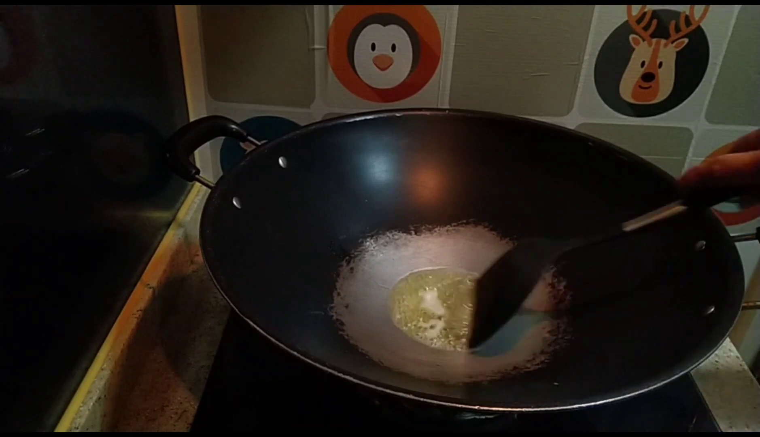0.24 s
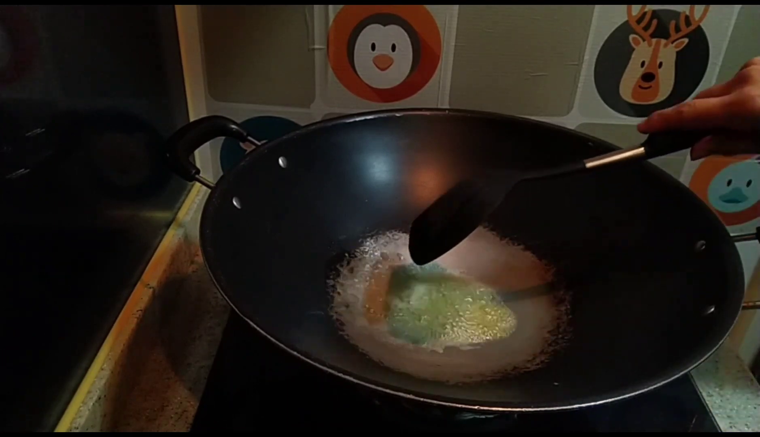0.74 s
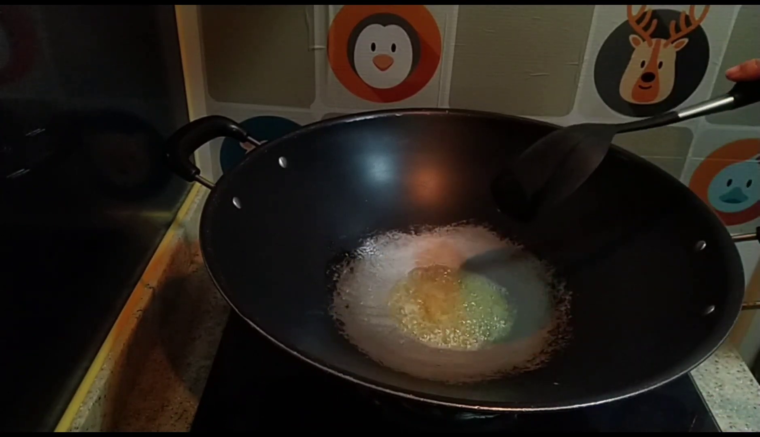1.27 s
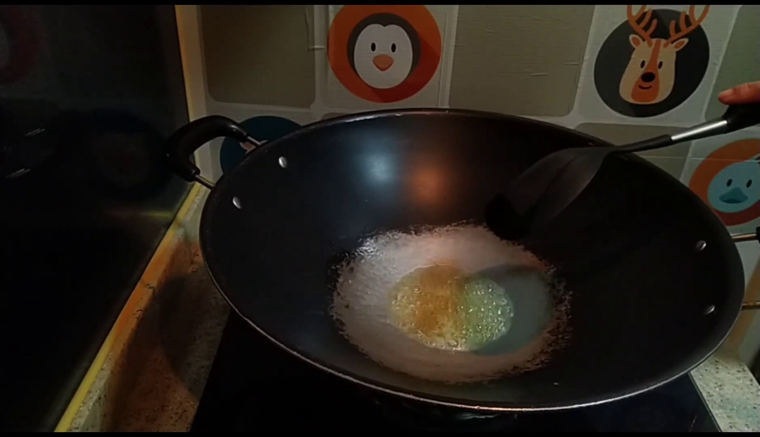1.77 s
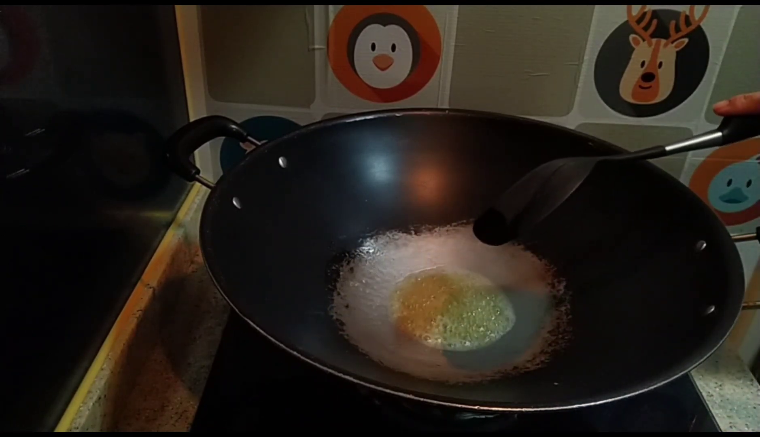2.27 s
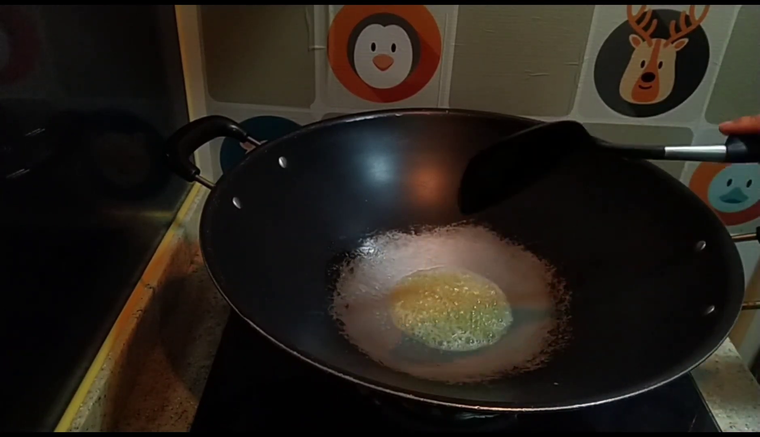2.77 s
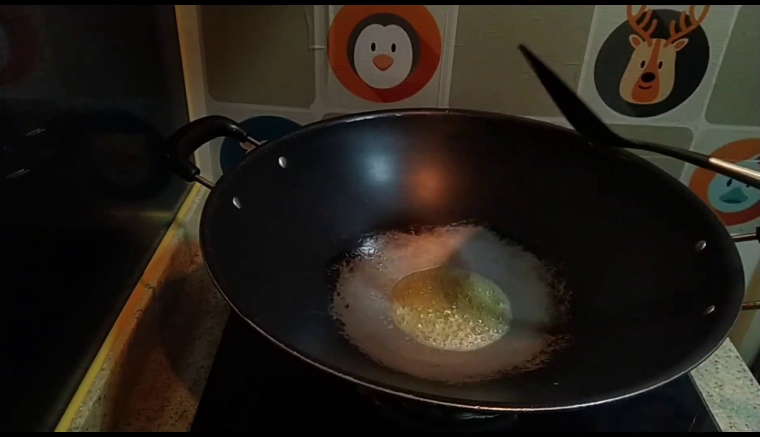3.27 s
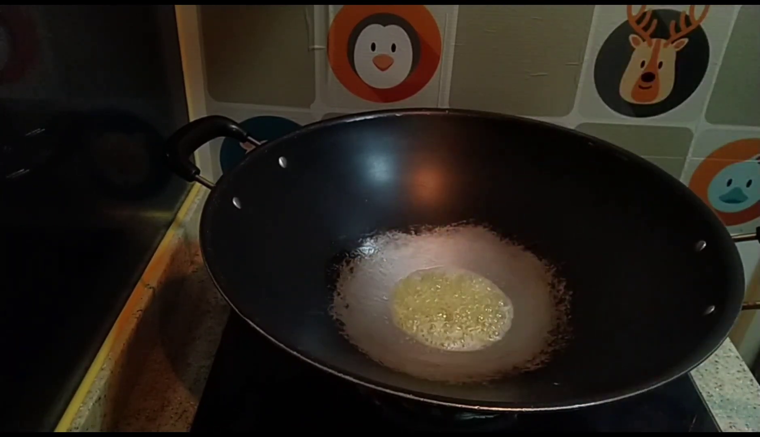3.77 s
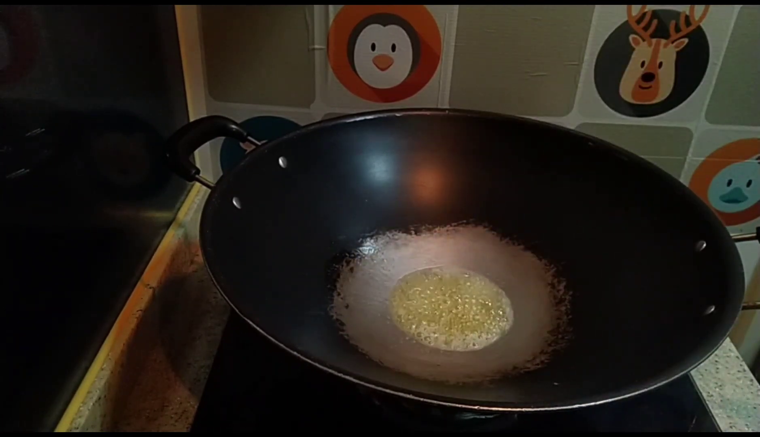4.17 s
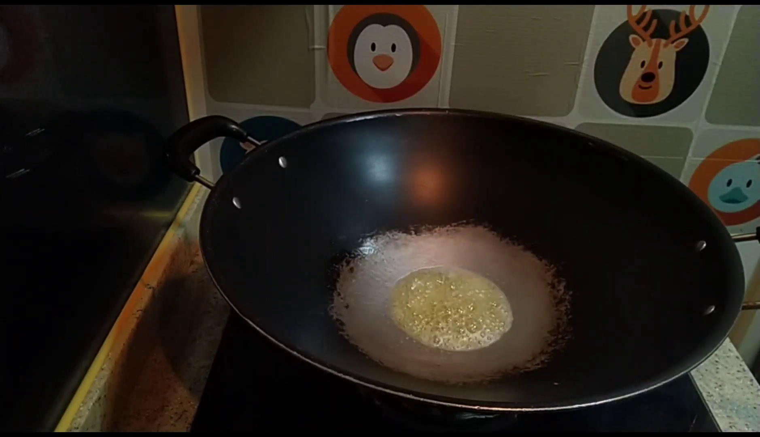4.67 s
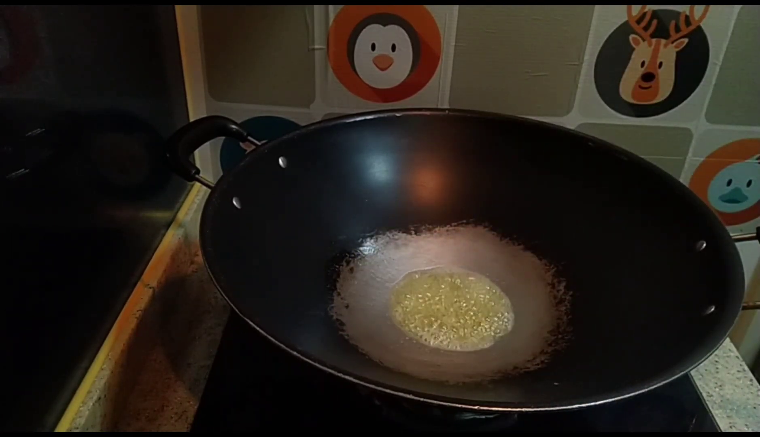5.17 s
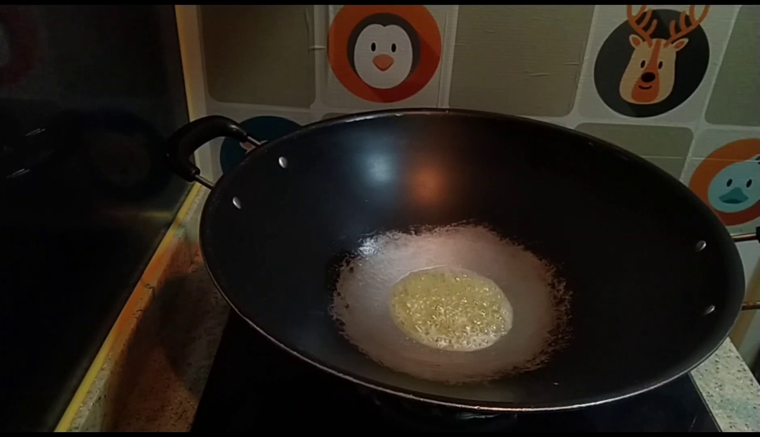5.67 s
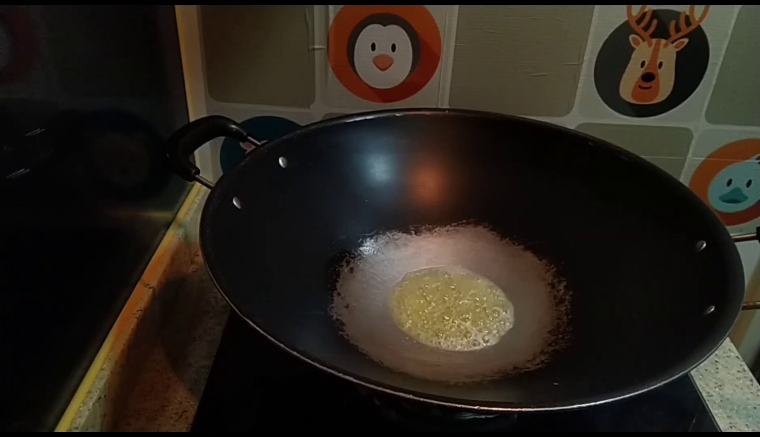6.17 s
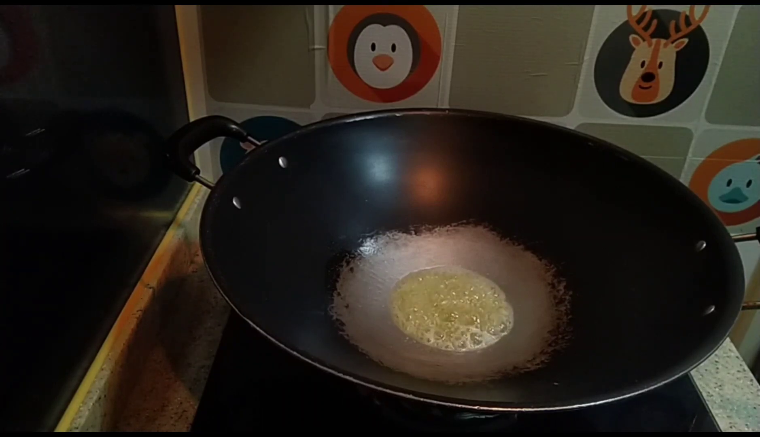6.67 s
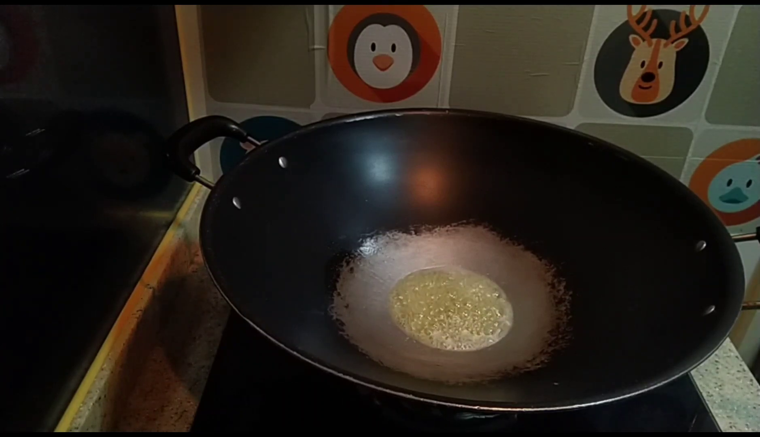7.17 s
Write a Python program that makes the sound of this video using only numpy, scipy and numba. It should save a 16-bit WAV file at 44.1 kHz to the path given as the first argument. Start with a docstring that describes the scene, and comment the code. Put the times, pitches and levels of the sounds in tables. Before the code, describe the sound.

Close, crackling sizzle of butter bubbling in a steel wok, with one soft spatula push early and a quick double knock.

```python
"""In a small kitchen, butter sizzles in a hot steel wok, heard in mono from about an arm's length.
Each bursting steam bubble is a damped oscillator, smeared by reflections in the bowl and the room:
the pool boils, its thin film fizzes, blisters plop and sputter, and droplets of fat spit.
A plastic spatula pushes the butter once: the pool quiets and refills while the smear hisses and cooks
off. Later something knocks twice nearby. A low stove hum lies under it all."""
import sys
import numpy as np
from scipy import signal
from scipy.fft import rfft, irfft, next_fast_len
from scipy.io import wavfile
from numba import njit

SR = 44100
rng = np.random.default_rng(int(sys.argv[2]) if len(sys.argv) > 2 else 0)


def int16_out(signal):
    """Quantize to a 16-bit WAV file."""
    q = np.round(np.clip(np.atleast_2d(signal).T, -1, 1) * 32767)
    wavfile.write(sys.argv[1], SR, q.astype(np.int16))


N = 327663
T = np.arange(N) / SR

# spectral envelope of the sizzle: (frequency [Hz], gain [dB])
SIZZLE_SPECTRUM = [(1500, -44), (1800, -34), (2100, -11), (2300, -5.5), (2750, -5), (3300, 0), (4200, -1.5),
                   (5200, -3.5), (6400, -5.5), (7650, -6), (8300, -15.5), (9200, -22.5), (11000, -27),
                   (15500, -56)]
# spectral envelope of the finest spray: (frequency [Hz], gain [dB])
SPRAY_SPECTRUM = [(7000, 13.5), (8200, 12), (9600, -4), (11000, -5.5), (13000, -2), (15500, 2)]
# resonances of the steel bowl: (frequency [Hz], bandwidth [Hz], relative gain [dB])
WOK_MODES = [(1230, 39, 1), (1710, 7.5, -9), (1860, 16, 4), (2000, 11, 3), (2269, 62, 0), (2586, 24, 9),
             (2830, 16, 9.5), (3168, 40, 6.5), (3287, 8, 0), (3523, 120, -4.5), (4120, 64, 2)]
# spectral envelope of stove and kitchen noise: (frequency [Hz], gain [dB])
WHIR_SPECTRUM = [(25, -15), (50, -19), (85, -5), (140, -1.5), (200, -12), (270, 2), (330, -1.5), (390, -1),
                 (500, -1), (650, -2), (1200, -4.5), (1600, -4), (4000, -43.5), (15000, -27)]
# tones of the stove: (frequency [Hz], median rms level [dB])
HUM_TONES = [(101, -80.5), (141, -86.5), (325, -77), (528, -78), (791, -80.5)]
# blisters that open with a plop: (time [s], relative level [dB], frequency [Hz])
BLISTER_PLOPS = [(.035, -32.5, 1945), (1.257, -34, 2280), (1.53, -47.5, 1760), (1.731, -42, 2130),
                 (1.863, -44, 2250), (2.146, -35, 2090), (2.33, -42, 1870), (2.383, -31.5, 2150),
                 (2.717, -31, 1930), (2.73, -35.5, 1720), (3.17, -41, 2270), (3.202, -41, 2100),
                 (3.367, -32, 1940), (3.385, -39.5, 1900), (3.991, -38.5, 1905), (4.051, -37.5, 2050),
                 (4.36, -37.5, 1880), (4.535, -40.5, 1980), (4.927, -38.5, 1880), (5.037, -41, 1900),
                 (5.314, -39, 2040), (5.46, -35, 2010), (5.515, -32, 2004), (5.73, -33.5, 2070),
                 (5.792, -34.5, 2050), (6.199, -45, 2020), (6.293, -38, 2030), (6.525, -34, 1950),
                 (6.572, -37.5, 1840), (6.831, -42, 1910), (6.905, -38, 2035), (6.963, -35, 2030),
                 (7.178, -37, 2250), (7.276, -29.5, 2040)]
# the loudest sharp bursts: (time [s], relative level [dB], frequency [Hz])
BUBBLE_POPS = [(0.1498, -23.5, 2750), (0.217, -22.5, 3230), (0.4469, -28, 3680), (0.5484, -31, 4500),
               (0.8774, -25, 4300), (1.0014, -26.5, 3550), (1.2047, -24, 3100), (1.2413, -19.5, 4180),
               (2.0228, -30, 4180), (2.4099, -24, 3180), (2.5177, -24, 3700), (2.846, -27, 3270),
               (2.9597, -25, 3230), (3.2334, -23.5, 3520), (3.4644, -23, 3990), (3.8661, -24, 3840),
               (3.927, -22, 3450), (3.9599, -23.5, 2830), (4.1203, -24, 4540), (4.16, -22.5, 2580),
               (4.1939, -19.5, 4130), (4.4525, -24, 3260), (4.5504, -22.5, 3530), (4.628, -22, 3340),
               (4.7277, -22.5, 3380), (4.9044, -20, 3100), (5.8173, -26, 3130), (5.8591, -23.5, 3650),
               (5.98, -27, 3130), (6.0755, -22, 3380), (6.0995, -22.5, 4080), (6.1333, -25, 4130),
               (6.1454, -27, 3380), (6.2896, -30, 4170), (6.7531, -25, 2950), (7.0788, -21.5, 3770),
               (7.1644, -22, 4160)]
# spitting droplets: (time [s], peak level [dB], lower band edge [Hz], upper band edge [Hz])
FAT_SPITS = [(.2144, -40, 7000, 15800), (0.594, -20, 3770, 6300), (1.888, -46, 7000, 16000),
             (3.186, -38, 6500, 16000), (3.96, -50, 7000, 16000), (6.018, -46, 7000, 16000)]
# spatula strokes: (time [s], duration [s], relative level [dB])
SPATULA_STROKES = [(0.313, 0.28, -50.5), (0.622, 0.17, -55.5)]
# soft contacts of spatula and wok: (time [s], relative level [dB], frequency [Hz])
SPATULA_BUMPS = [(.345, -55, 660), (0.375, -39, 539), (0.415, -41, 315), (.64, -53, 528), (.745, -55, 947),
                 (0.794, -47, 315), (.955, -61, 248), (1.40, -50.5, 542), (1.439, -44, 320),
                 (1.505, -56, 423), (2.759, -52.5, 527), (3.419, -56, 474), (3.549, -61, 100.5),
                 (3.669, -45, 536), (4.025, -47, 517), (6.012, -48.5, 533), (6.535, -53, 317),
                 (6.661, -57, 318)]
# faint rings of the bowl's lowest mode: (time [s], relative level [dB])
BOWL_RINGS = [(1.8502, -60), (2.8399, -65), (3.2924, -57), (3.603, -56), (4.3271, -55), (4.9496, -53),
              (4.977, -50), (5.2904, -56), (5.5603, -57), (6.6066, -53)]
# two dull knocks, the second a double contact: (time [s], contact peak [dB], hollow body peak [dB])
KNOCK_CONTACTS = [(5.629, -39.5, -49.5), (5.722, -33, -46), (5.735, -28, -36)]
# modes of the knocked object: (frequency [Hz], relative level [dB], 60 dB decay time [s])
OBJECT_MODES = [(458, -8, 0.12), (525, -4, 0.07), (960, -5, 0.15), (1105, 0.5, 0.098), (1198, 9, 0.058),
                (1270, -22, .15)]

LARGE_DB, SMALL_DB, FIZZ_DB, SPRAY_DB = -47.5, -38, -41.5, -66  # undisturbed boil, rms before surges
EMPTY_LARGE_DB, EMPTY_SMALL_DB = -13.5, -7.5  # gains when the pool is emptied
SMEAR_HISS_DB, SMEAR_SPRAY_DB = -44.5, 9.5  # fresh smear: hiss rms before surges, gain of the spray
CUTOFF_HZ = 15550


def undb(db):
    """Amplitude ratio of a level in decibels."""
    return 10 ** (np.asarray(db) / 20)


def level(x, db):
    """Scale a signal to an rms level."""
    return x * undb(db) / np.sqrt(np.mean(x ** 2))


def add(out, s, x, db):
    """Superpose a sound at time s with a given peak level."""
    i = max(int(s * SR), 0)
    out[i:i + len(x)] += (x * undb(db) / np.abs(x).max())[:N - i]


def fade(t60):
    """Half a second of exponential decay, falling 60 dB in t60 seconds."""
    return np.exp(-np.log(1000) * T[:SR // 2] / t60)


def swell(start_s, rise_s, hold_s, decay_s):
    """Envelope from 0 to 1: linear rise, hold, exponential relaxation."""
    rise = np.clip((T - start_s) / rise_s, 0, 1)
    return rise * np.exp(-np.maximum(T - start_s - rise_s - hold_s, 0) / decay_s)


def band(x, lo_hz, hi_hz, order=2):
    """Band-pass filter."""
    edges = [lo_hz, min(hi_hz, SR / 2 - 1)]
    return signal.sosfilt(signal.butter(order, edges, "band", fs=SR, output="sos"), x)


def colour(x, spectrum):
    """Weight a signal by a spectral envelope."""
    hz, db = np.transpose(spectrum)
    size = next_fast_len(N + SR)
    f = np.maximum(np.fft.rfftfreq(size, 1 / SR), 1)
    return irfft(rfft(x, size) * undb(np.interp(np.log(f), np.log(hz), db)), size)[:N]


def drift(rate):
    """Random modulation of unit rms, with rate new values a second."""
    knots = rng.standard_normal(int(N / SR * rate) + 2)
    return level(np.interp(T * rate, np.arange(len(knots)), knots), 0)


def echoes(bowl_db, bowl_t60, room_db, room_t60):
    """Impulse response from one spot: direct sound, early bowl reflections, tiled-room reverberation."""
    path = np.zeros(SR // 2)
    for db, t60 in ((bowl_db, bowl_t60), (room_db, room_t60)):
        tail = rng.standard_normal(SR // 2) * fade(t60)
        path += undb(db) * tail / np.linalg.norm(tail)
    path[0] += 1
    return path


def ping(hz, cycles):
    """A resonance builds up, then decays with a time constant given in cycles."""
    age = T[:SR // 8] * hz
    return (1 - np.exp(-age * 4 / cycles)) * np.exp(-age / cycles) * np.sin(2 * np.pi * age)


@njit
def damped_sines(start, hz, cycles, amplitude):
    """Superposition of damped oscillators, one for each bubble."""
    out = np.zeros(N)
    for k in range(len(start)):
        pole = np.exp((2j * np.pi - 1 / cycles[k]) * hz[k] / SR)
        z = amplitude[k] + 0j
        for i in range(int(start[k]), min(N, int(start[k] + 6 * cycles[k] * SR / hz[k]))):
            out[i] += z.imag
            z *= pole
    return out


def bubbles(rate, lo_hz, hi_hz, cycles, spread_db, spots=4):
    """Shot noise of random bursts, many weak and a few strong; each spot has its own echoes."""
    out = np.zeros(N)
    for _ in range(spots):
        when, pitch, ring, chance = rng.random((int(rate * N / SR / spots), 4)).T
        hz = lo_hz + (hi_hz - lo_hz) * pitch
        decay_cycles = cycles * (.5 + ring)
        size = np.minimum(-np.log(1 - chance), 4.8)  # capped exponential distribution
        amplitude = undb(spread_db * size) * np.sqrt(hz / decay_cycles)
        path = echoes(bowl_db=2, bowl_t60=0.064, room_db=-2.5, room_t60=0.39)
        out += signal.oaconvolve(damped_sines(when * N, hz, decay_cycles, amplitude), path)[:N]
    return out


def wok(x, ring_db):
    """Forced vibration: the steel bowl adds its narrow resonances."""
    ring = sum(undb(db) * signal.lfilter(*signal.iirpeak(hz, hz / width, fs=SR), x)
               for hz, width, db in WOK_MODES)
    return x + undb(ring_db) * ring


def emptiness():
    """Displacement and relaxation, 0 to 1: the spatula parts the pool and the butter runs back."""
    return swell(start_s=0.062, rise_s=0.22, hold_s=0.18, decay_s=0.74)


def pool():
    """Bubble resonance in quick surges: large bubbles ring lower, and quiet most as the pool parts."""
    large = bubbles(rate=520, lo_hz=2090, hi_hz=2690, cycles=3.2, spread_db=5, spots=8)
    small = bubbles(rate=1800, lo_hz=2640, hi_hz=5000, cycles=2.1, spread_db=3.3, spots=12)
    large = colour(wok(band(large, 2143, 2870, order=6), ring_db=-1.5), SIZZLE_SPECTRUM)
    small = colour(wok(band(small, 2520, 9000, order=6), ring_db=-6), SIZZLE_SPECTRUM)
    return (level(large, LARGE_DB) * undb(EMPTY_LARGE_DB * emptiness() + 2.06 * drift(14))
            + level(small, SMALL_DB) * undb(EMPTY_SMALL_DB * emptiness() + 0.97 * drift(42)))


def film():
    """Finer bubbles resonate higher: the film fizzes and sprays, and a fresh smear hisses until dry."""
    smear = swell(start_s=0.016, rise_s=0.66, hold_s=0.9, decay_s=1)
    fizz = bubbles(rate=5000, lo_hz=4550, hi_hz=8830, cycles=1.92, spread_db=4.5, spots=8)
    hiss = bubbles(rate=4000, lo_hz=6500, hi_hz=10060, cycles=3.2, spread_db=5)
    spray = bubbles(rate=3000, lo_hz=7270, hi_hz=15200, cycles=1.3, spread_db=2, spots=3)
    fizz = level(colour(band(fizz, 4850, 13000), SIZZLE_SPECTRUM), FIZZ_DB)
    hiss = level(colour(band(hiss, 5500, 16000), SIZZLE_SPECTRUM), SMEAR_HISS_DB)
    spray = level(colour(band(spray, 4600, 20000), SPRAY_SPECTRUM), SPRAY_DB)
    return undb(0.88 * drift(50)) * (fizz + hiss * smear + spray * undb(SMEAR_SPRAY_DB * smear))


def stove():
    """A broadband whir and a line spectrum of hum, both under slight random modulation."""
    whir = level(colour(rng.standard_normal(N), WHIR_SPECTRUM), -66.5)
    waver = undb(.6 * drift(6))
    hum = sum(undb(db + 2 * drift(7)) * np.sqrt(2) * np.sin(2 * np.pi * hz * T + 0.28 * drift(7.5))
              for hz, db in HUM_TONES)
    return whir * waver + hum


def simmer():
    """Stray blisters resonate faintly in a narrow band, more faintly while the pool is parted."""
    stray = bubbles(rate=41, lo_hz=1812, hi_hz=1980, cycles=7, spread_db=1)
    return level(band(stray, 1784, 2064, order=4), -65) * undb(-10 * emptiness())


def plops():
    """Low blister resonances excite wok and room, and each leaves a dying sputter of big bubbles."""
    out, sputter_power = np.zeros(N), np.zeros(N)
    for s, db, hz in BLISTER_PLOPS:
        path = echoes(bowl_db=-2, bowl_t60=0.076, room_db=4, room_t60=0.3)
        ring = wok(signal.fftconvolve(ping(hz, cycles=5.8), path), ring_db=3)
        add(out, s, band(ring, 0.805 * hz, 1.072 * hz, order=4), db - 3.5)
        envelope = undb(db - 11) * swell(s, rise_s=0.0037, hold_s=0.011, decay_s=0.05)
        sputter_power += envelope ** 2  # incoherent sources add in power
    sputter = bubbles(rate=700, lo_hz=1875, hi_hz=2580, cycles=3.5, spread_db=3.5)
    sputter = wok(band(sputter, 1823, 2600, order=4), ring_db=-1.5)
    return out + level(sputter, 0) * np.sqrt(sputter_power)


def pops():
    """Impulse excitation: a large bubble tears open with a crack and a heavily damped ring."""
    out = np.zeros(N)
    for s, db, hz in BUBBLE_POPS:
        tone = ping(hz, cycles=2.9)
        tone[0] += 2.8  # the film snaps
        path = echoes(bowl_db=6, bowl_t60=0.055, room_db=3, room_t60=0.32)
        burst = wok(signal.fftconvolve(tone, path), ring_db=-9)
        add(out, s, band(burst, 2580, 6100, order=6), db - 2)
    return out


def spits():
    """A spitting droplet is an impulse, heard as a treble band of the response of bowl and room."""
    out = np.zeros(N)
    for s, db, lo_hz, hi_hz in FAT_SPITS:
        crack = echoes(bowl_db=2, bowl_t60=0.036, room_db=-11, room_t60=.25)
        add(out, s, band(crack, lo_hz, hi_hz, order=3), db)
    return out


def spatula():
    """Stick-slip friction of plastic on greasy steel rings one narrow band; the blade also bumps."""
    out = np.zeros(N)
    slips = (rng.random(N) < 150 / SR) * undb(2 * rng.standard_normal(N))  # about 150 a second
    rub = level(band(slips, 1375, 1450), 0)
    for s, duration, db in SPATULA_STROKES:
        pressure = np.maximum(1 - (2 * (T - s) / duration - 1) ** 2, 0)
        out += undb(db - 3.5) * rub * pressure
    # a soft contact swells and ebbs, and so excites only a narrow band
    contact = swell(0, rise_s=0.0087, hold_s=0.0098, decay_s=0.0083)[:SR // 8]
    for s, db, hz in SPATULA_BUMPS:
        thud = contact * np.sin(2 * np.pi * hz * T[:SR // 8])
        path = echoes(bowl_db=-1, bowl_t60=0.073, room_db=-4, room_t60=0.27)
        add(out, s, signal.fftconvolve(thud, path), db - 2)
    return out


def bowl_rings():
    """Free vibration: now and then the bowl sounds faintly in its lowest mode."""
    out = np.zeros(N)
    hz = WOK_MODES[0][0]
    for s, db in BOWL_RINGS:
        path = echoes(bowl_db=1, bowl_t60=0.054, room_db=4.5, room_t60=0.45)
        ring = signal.fftconvolve(ping(hz, cycles=12), path)
        add(out, s, band(ring, hz, 1.3 * hz, order=3), db - 1.5)
    return out


def knocks():
    """Modal vibration: each contact rings the high modes and, more weakly, the hollow body."""
    out = np.zeros(N)
    modes = np.array([undb(db) * fade(t60) * np.sin(2 * np.pi * hz * T[:SR // 2])
                      for hz, db, t60 in OBJECT_MODES])
    hollow = np.array(OBJECT_MODES)[:, 0] < 700
    contact = band(modes[~hollow].sum(0), 880, 1270, order=3)
    body = band(modes[hollow].sum(0), 407, 594, order=3)
    for s, contact_db, body_db in KNOCK_CONTACTS:
        for ring, db in ((contact, contact_db), (body, body_db)):
            path = echoes(bowl_db=-4, bowl_t60=0.062, room_db=-4, room_t60=0.23)
            add(out, s, signal.fftconvolve(ring, path), db)
    return out


def scene():
    """Superposition: all sources add at one point, the same in both channels."""
    butter = pool() + film() + pops() + spits() + plops() + simmer()
    return np.tile(butter + bowl_rings() + spatula() + knocks() + stove(), (2, 1))


def record(dry):
    """Band limiting: a steep low-pass filter removes the highest treble."""
    return signal.sosfilt(signal.ellip(10, .2, 70, CUTOFF_HZ, fs=SR, output="sos"), dry)


dry = scene()
out = record(dry)
int16_out(out)
```